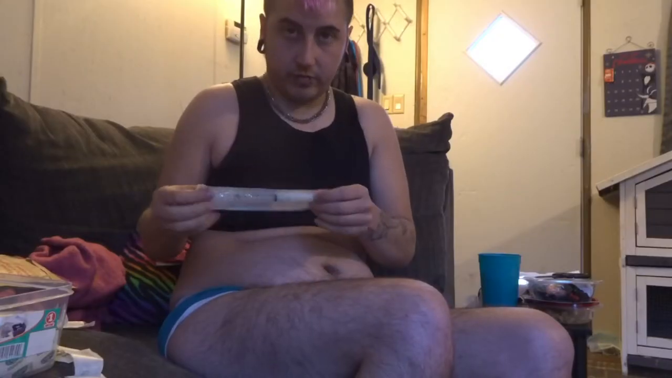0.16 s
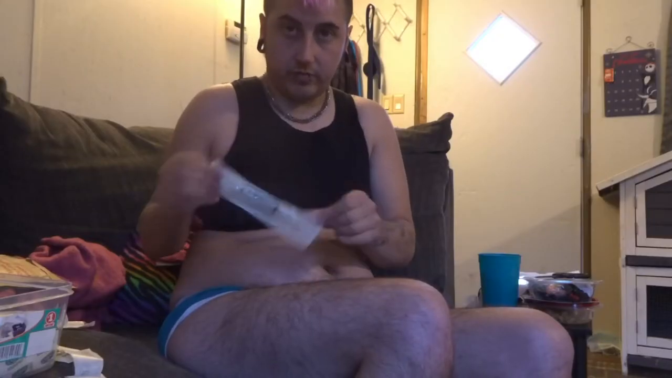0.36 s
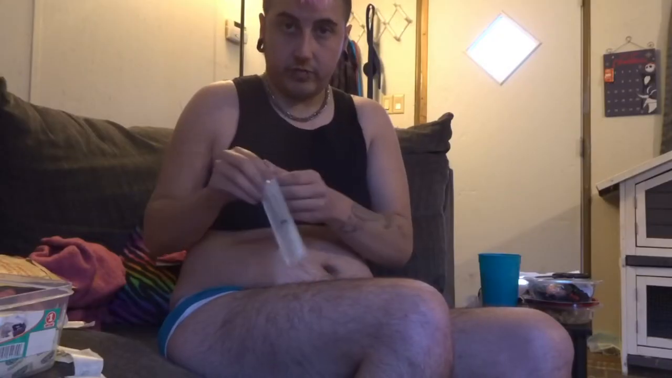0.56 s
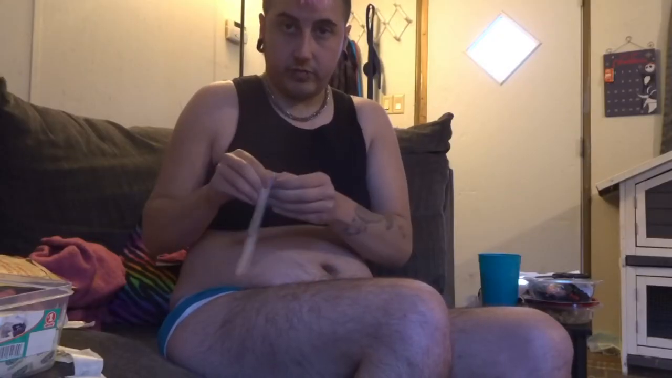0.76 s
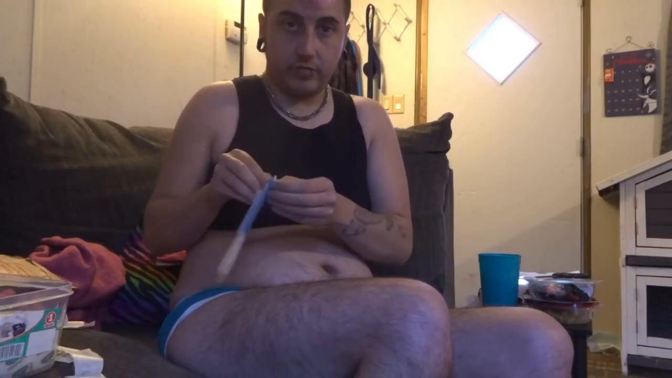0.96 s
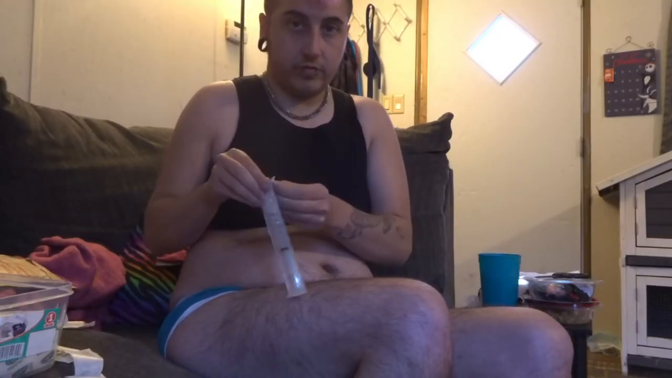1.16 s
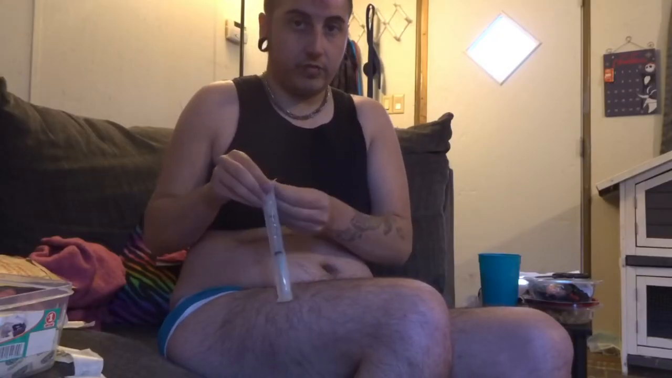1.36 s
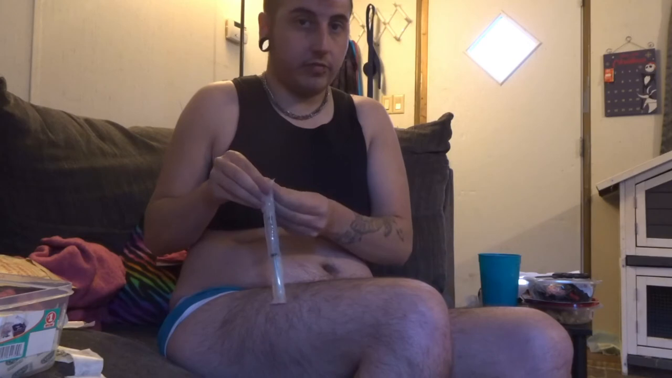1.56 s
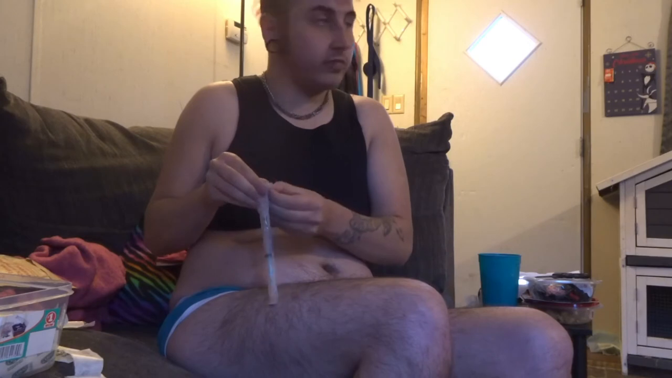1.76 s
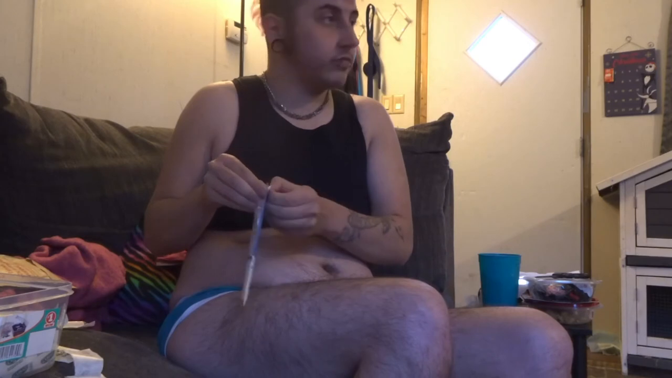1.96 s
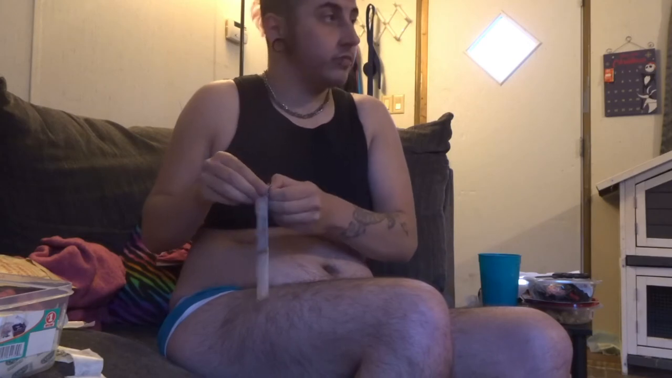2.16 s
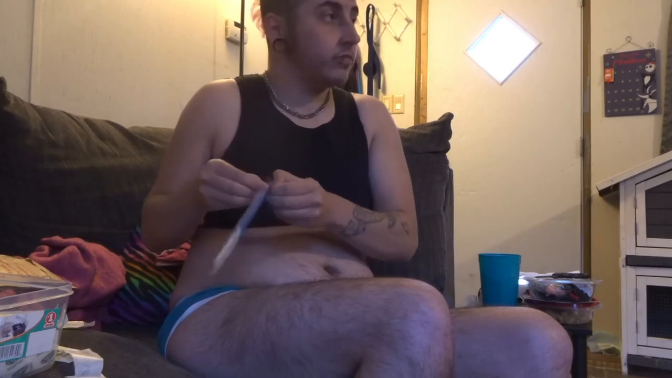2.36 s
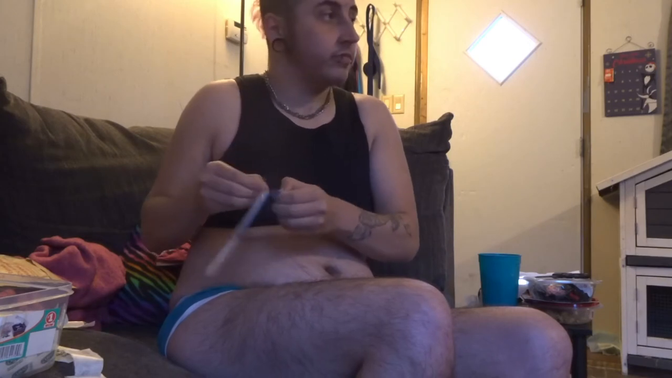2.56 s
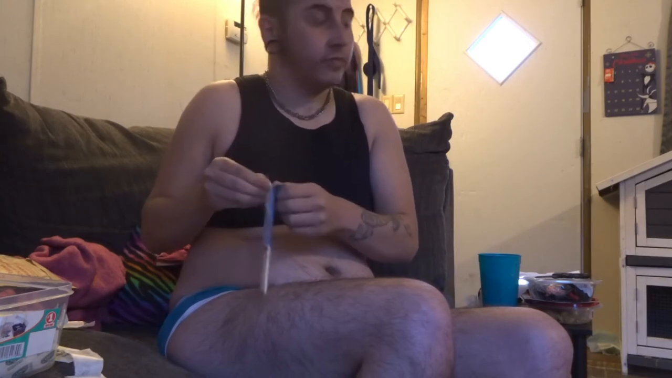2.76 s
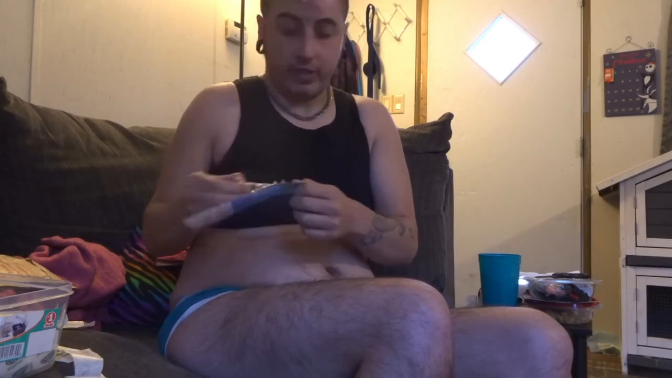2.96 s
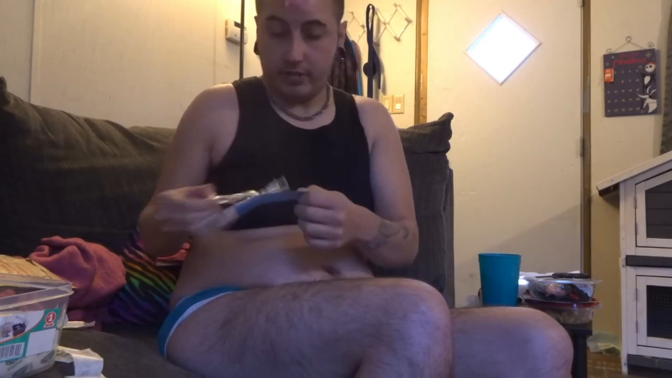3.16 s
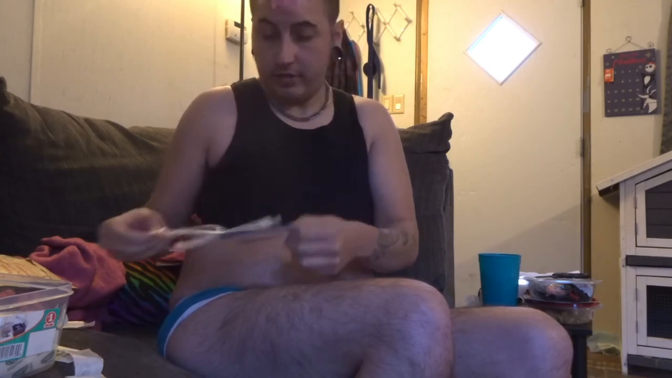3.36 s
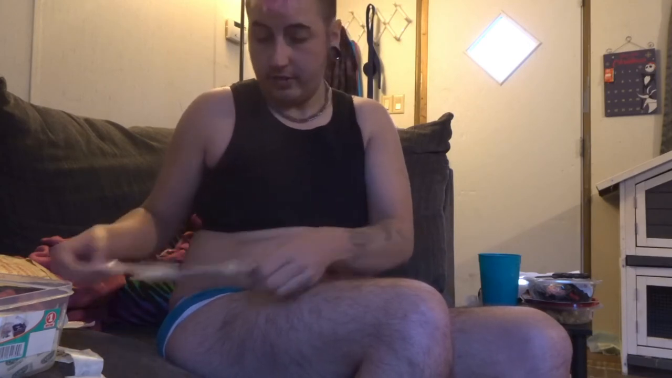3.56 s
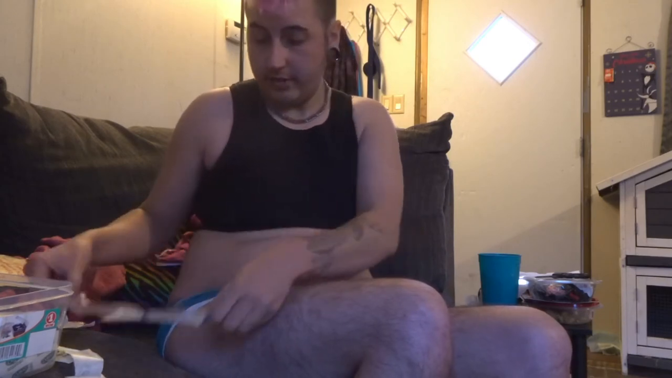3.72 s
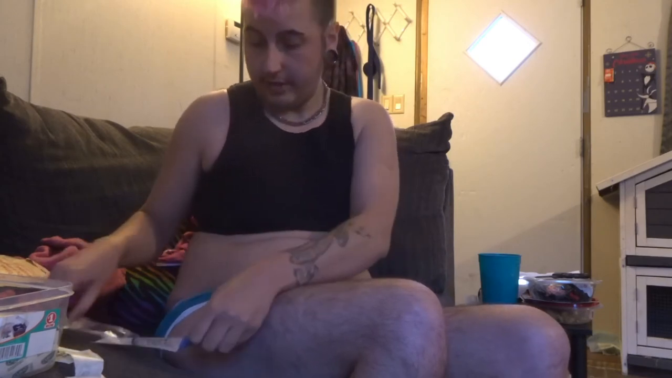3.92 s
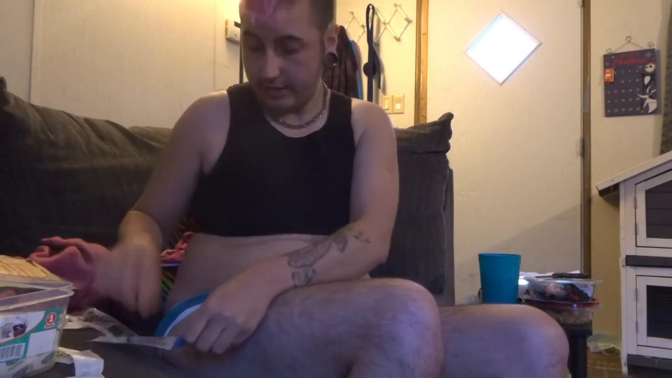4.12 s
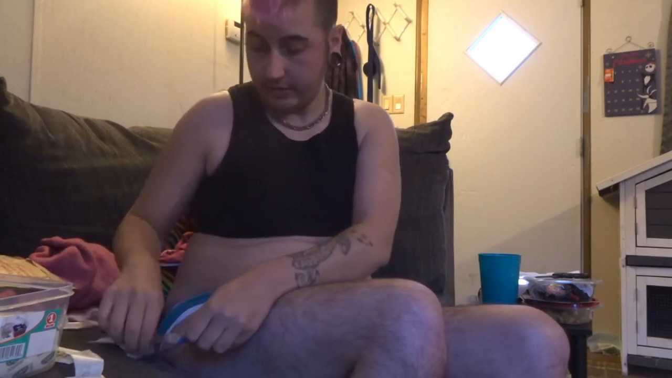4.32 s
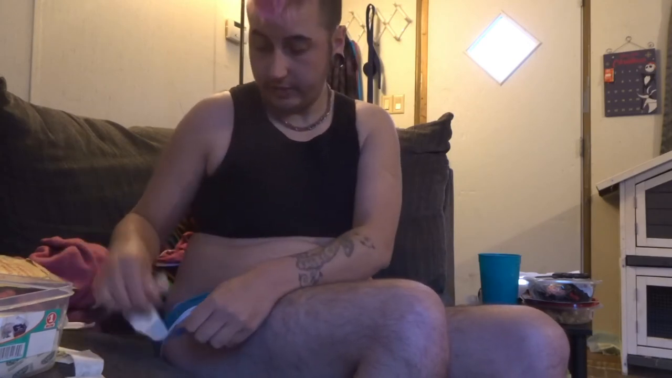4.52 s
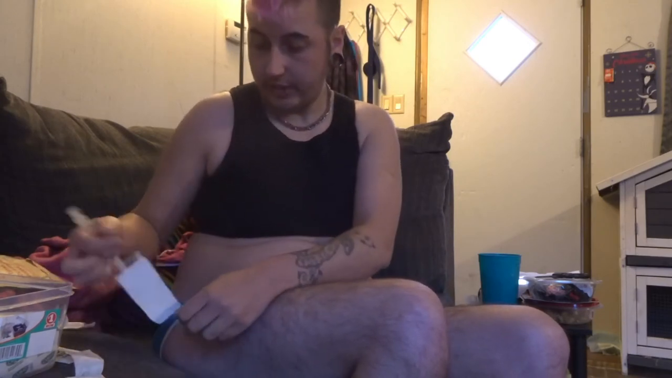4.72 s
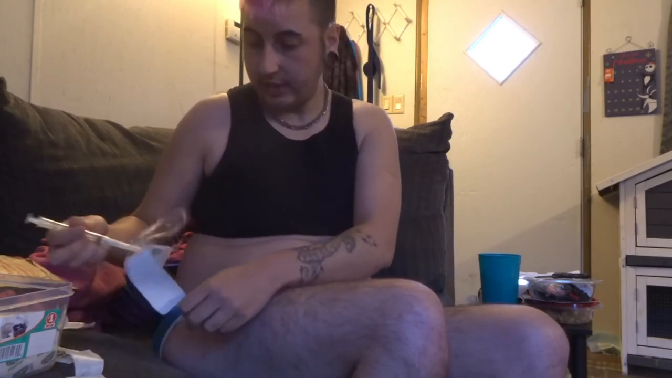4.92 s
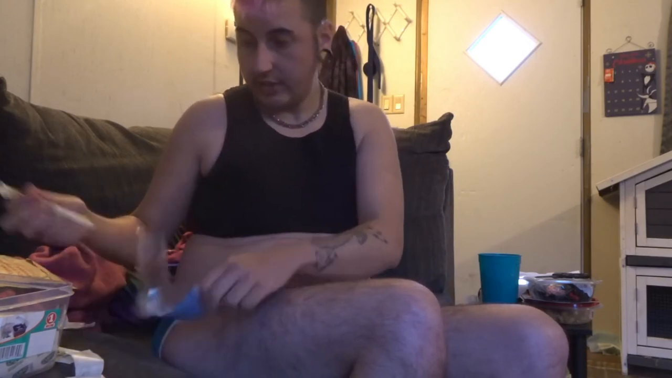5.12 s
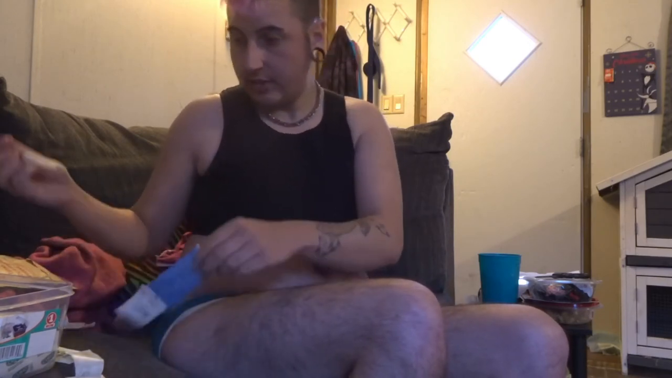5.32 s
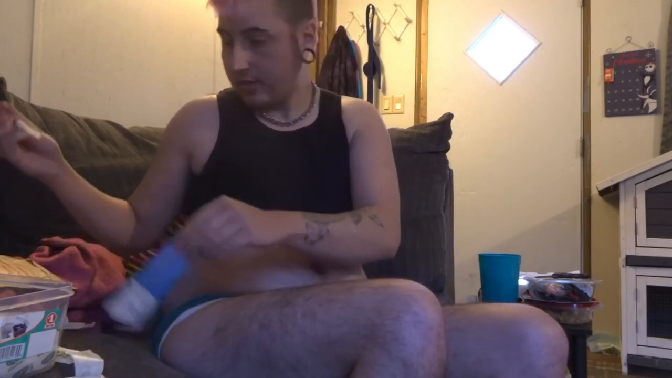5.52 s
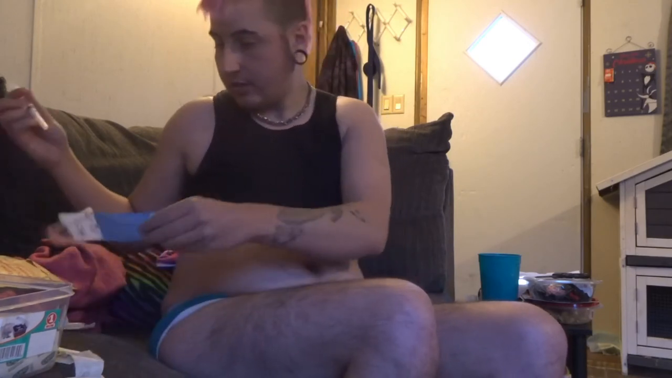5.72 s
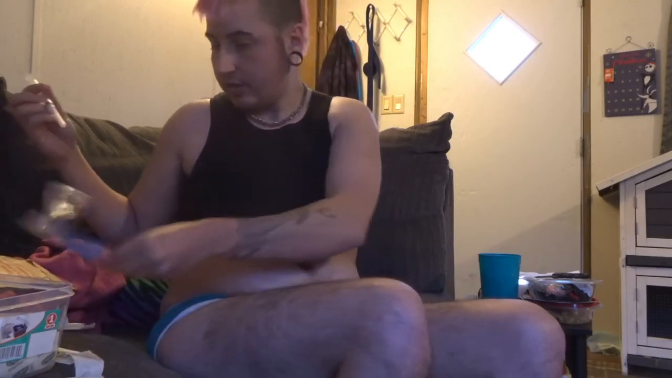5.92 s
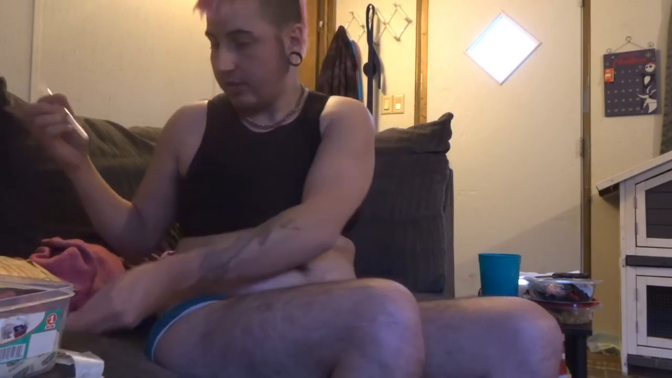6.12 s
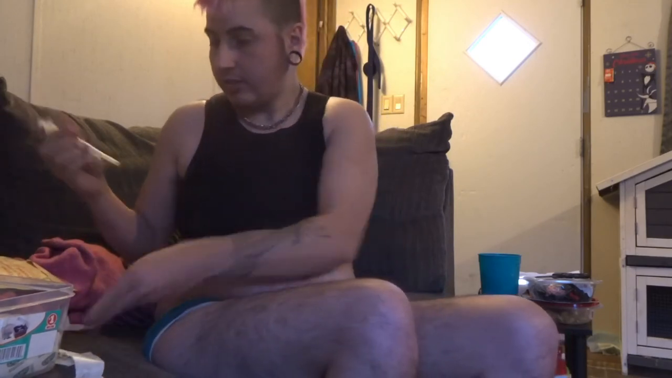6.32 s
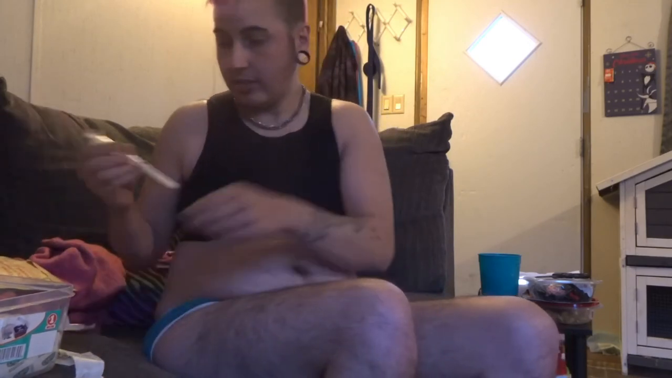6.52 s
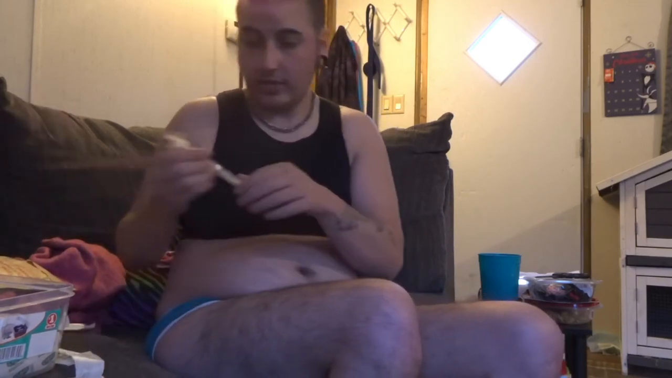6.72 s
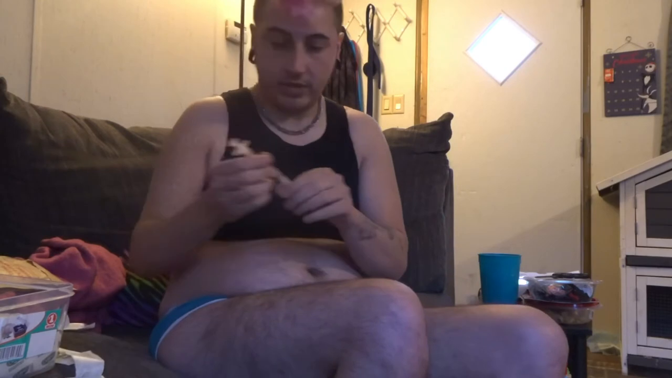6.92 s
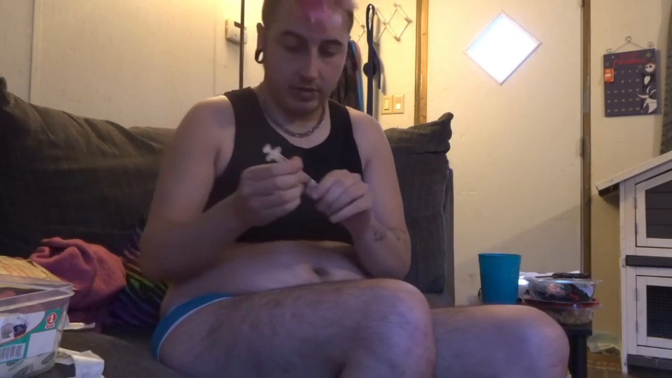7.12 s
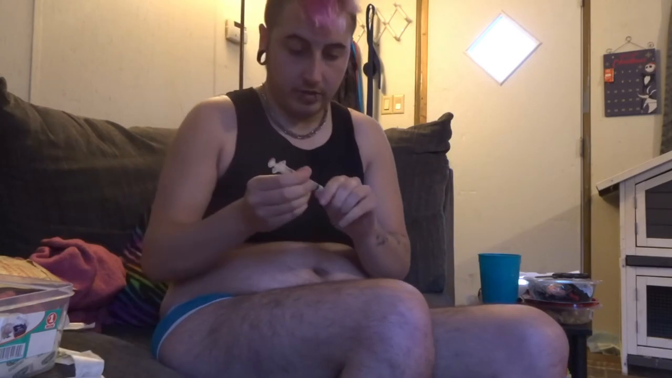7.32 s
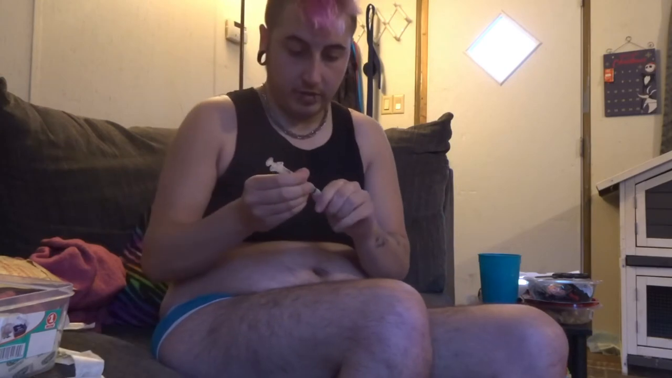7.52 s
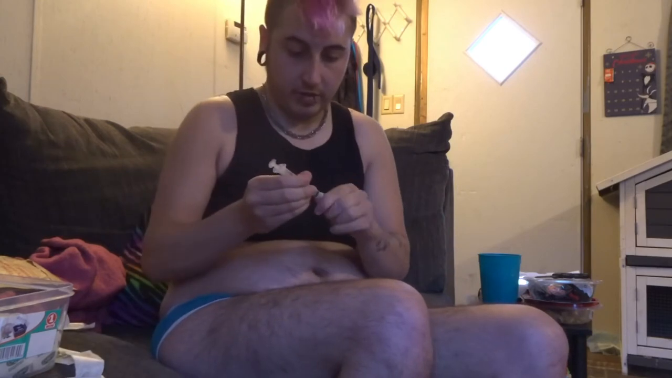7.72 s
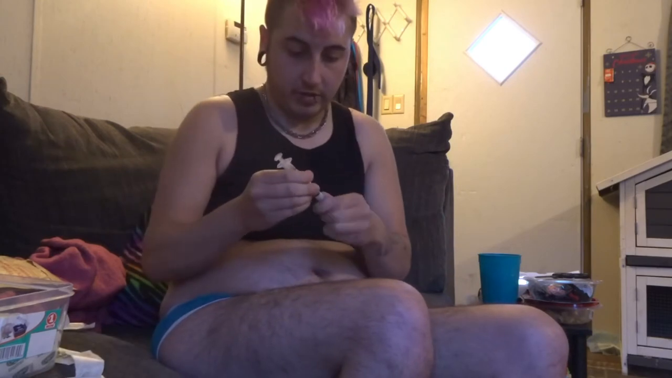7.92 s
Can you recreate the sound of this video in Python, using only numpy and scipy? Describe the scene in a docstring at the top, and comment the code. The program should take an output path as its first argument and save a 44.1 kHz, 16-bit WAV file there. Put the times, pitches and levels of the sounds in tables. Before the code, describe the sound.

Crisp plastic film buckles in uneven pops and crackles at the start, eases off, then builds into a ripping, crunchy peel around the three-second mark. Lighter, duller handling follows, with a short squeak and little low knocks, then very soft brushing and a few last ticks. A close stereo microphone on a table hears it in a small furnished room, with gentle hiss and a barely audible fan tone.

```python
"""Someone on a sofa picks at a stiff plastic wrapper, peels it open, slides a syringe out and lays the wrapper aside.
Facets of the film buckle with short pitched snaps, modal rings after a crack, over a crinkle of countless tiny pops.
Rips, squeaks, soft brushes, low knocks and short rings are bursts of filtered noise, each in one band.
Throughout, a close pair of microphone ports hears it across a table, in a small quiet room of scattered echoes,
with steady filtered hiss and a faint narrow fan whine."""
import sys
import numpy as np
from scipy import signal
from scipy.fft import rfft, irfft, next_fast_len
from scipy.io import wavfile

SR = 44100
rng = np.random.default_rng(int(sys.argv[2]) if len(sys.argv) > 2 else 0)


def inscribe(sig):
    """Save sig as 16-bit PCM at rate SR to the path in sys.argv[1].

    A 1-D sig is mono; a 2-D sig holds one channel per row.
    Samples are clipped to [-1, 1] before scaling.
    """
    pcm = np.round(np.clip(np.atleast_2d(sig).T, -1, 1) * 32767)
    wavfile.write(sys.argv[1], SR, pcm.astype(np.int16))


N = 351918  # samples

PORT_GAP_S = 6.5e-5  # sound's travel time between the ports, for diffuse sound
LEFT_LEAD_S = 3.2e-5  # the wrapper's sound reaches the left port first

SNAP_PAN_DB, SNAP_SCATTER_DB = 0.2, 2  # left minus right: mean and spread

# Buckling facets that stand out. Each row: start in seconds, energy over 1 ms in dB, pitch in Hz,
# treble crack against body in dB, ring time in ms (limited when the facet sounds).
SNAPS = [(0.014, -37, 4600, 6, 0.87), (.032, -35.5, 3660, 2.5, 0.55), (0.0453, -19, 4640, -8.5, 0.83),
         (0.087, -51, 4930, 3, .9), (0.124, -20.5, 2503, -10, 0.88), (0.1548, -9.5, 3550, -12.5, 1.5),
         (0.2551, -11, 3900, -10, 0.2), (.2771, -14, 2840, 0, 2), (0.3461, -18, 2490, -24, .7),
         (0.357, -17.5, 3180, -0.5, 2), (0.3845, -16, 2565, -31, 0.22), (0.4668, -25.5, 2970, -13, 0.49),
         (.491, -21, 3740, 2.5, 0.74), (0.5005, -25.5, 4520, -17, 0.88), (0.5675, -31, 2730, -17, 2.4),
         (0.5843, -34, 3500, -23, 2.9), (.6574, -30.5, 2110, -22, 1.3), (0.6717, -28.5, 2820, -31, 2.9),
         (.7867, -37, 3840, -16, 0.61), (0.8456, -32, 3730, -17, .5), (0.8564, -20, 3300, -11, 0.95),
         (1.1885, -26, 3240, -8, 1.1), (1.4511, -42, 3413, -3, 2), (1.6615, -35.5, 2600, -29, 1.27),
         (1.6947, -37.5, 1920, -10.5, 3.3), (1.7154, -36.5, 1930, -6, 0.86), (1.899, -44, 2220, -30, 1),
         (1.923, -41.5, 3080, -19, 0.93), (2.064, -40.5, 1900, -22.5, 0.49), (2.0966, -33, 4660, -6.5, 1.5),
         (2.152, -44, 3570, -19, 0.89), (2.1727, -30.5, 2720, -33, 2), (2.2056, -39.5, 2650, -21, 1),
         (2.219, -37, 3430, -35, 2), (2.2344, -36, 2336, -24.5, 1.2), (2.365, -39, 3230, -5, 1.9),
         (2.3724, -26, 2360, -15, 2), (2.391, -22.5, 2760, -16.5, 1.2), (2.434, -20.5, 3970, -7, 0.23),
         (2.4758, -22.5, 3370, -9, 2.2), (2.5625, -35, 3350, -14, 1.1), (2.6985, -24.5, 3120, -12.5, 2.2),
         (2.724, -37.5, 3320, -16, 1.26), (2.758, -30.5, 4655, -6, 0.67), (2.7704, -36.5, 4630, -7, 1.3),
         (2.8171, -38, 3190, -12, 2.5), (2.825, -28.5, 2800, -15, 0.41), (2.8377, -29, 3060, -6, 1.7),
         (2.848, -23, 4280, -8, 3.8), (2.8587, -23.5, 3450, -1, 2), (2.883, -20, 3030, -8.5, 2.8),
         (2.89, -24, 4140, -12, 1.2), (2.92, -16, 3270, -15.5, 1.6), (2.9302, -17.5, 4140, 11, 1.3),
         (2.9436, -26, 3150, -7, 1.4), (2.973, -26.5, 2620, -5, 3.1), (2.9806, -20, 3260, -20, 2.1),
         (2.9985, -25.5, 4800, -5, 2.5), (3.0427, -27, 3830, -13, 0.64), (3.1068, -14.5, 2330, -2.5, 3.7),
         (3.1802, -20.5, 3710, -3.5, 1.2), (3.1921, -20.5, 2710, -10, 2.9), (3.2, -24.5, 3845, -4, 0.93),
         (3.2231, -15.5, 3300, -2, 1.3), (3.2402, -23, 5600, -10, .7), (3.26, -25, 5330, -12, 1.2),
         (3.265, -20, 3800, -12, 1.1), (3.3222, -24, 2100, 2, 1.6), (3.388, -22.5, 2690, -11.5, 2.9),
         (3.469, -29, 3834, -1.5, 1.7), (3.4895, -24.5, 3300, -6, 1.18), (3.6101, -31, 3735, -16, 1.9),
         (3.6622, -39.5, 4300, -2.5, 0.86), (3.6693, -39.5, 4700, -6, 2.2),
         (3.7107, -41.5, 2600, -21.5, 1.5), (3.7301, -33.5, 3070, -4, 1.1), (3.753, -32, 3920, -6, 1.2),
         (3.7858, -23, 3020, -10, 3.1), (3.7947, -23, 5090, -3.5, 2.7), (3.8606, -35, 2100, -10, 2.7),
         (3.868, -37, 4190, 1, 2), (3.9007, -39.5, 2700, -14, 1.15), (3.908, -35, 2900, 3, 2.8),
         (3.973, -34, 2726, -13, 1.4), (4.2088, -31.5, 2780, -29, 0.94), (4.2163, -35.5, 4380, -14.5, 2.8),
         (4.2532, -33, 2620, -30, 2.7), (4.417, -38, 2570, -17, 2), (4.4244, -42.5, 2234, -22, 2.05),
         (4.4718, -30, 2556, -21, 3.1), (4.5143, -32, 3600, -16, 1.2), (4.524, -29, 2050, -15.5, 2.2),
         (4.6017, -27, 2400, -32, 3.4), (4.772, -44, 2380, -7.5, 0.51), (4.795, -36, 2220, 2, 2.9),
         (4.8921, -30.5, 3410, -14, 2.5), (4.938, -32, 2770, -34, 2.3), (4.9587, -24, 3530, -7.5, 1.7),
         (5.011, -48, 2270, -21, 2.2), (5.039, -36, 3500, -26, 3.2), (5.046, -44, 3220, -14, 1.5),
         (5.0659, -28, 2290, -40, 3.4), (5.189, -25.5, 3460, -17, 1.1), (5.2663, -22.5, 2650, -7, 0.73),
         (5.4312, -26.5, 2070, -20, 1.7), (5.527, -38.5, 2320, -23, 2.4), (6.1223, -33, 3100, -41, 2.6),
         (7.511, -47.5, 3100, 0, 1.9), (7.5872, -39, 2380, -1.5, 0.79), (7.6221, -36.5, 2640, -2, 1.5),
         (7.7061, -31, 2580, 1, 0.67)]


def snaps(rows, gain_db=0):
    """Snap-through buckling: facets flip one by one, each at its own spot on the wrapper."""
    out = np.zeros((2, N + SR))
    for s, db, hz, treble_db, ring_ms in rows:
        sound = facet(hz, treble_db, ring_ms)
        pan_db = SNAP_PAN_DB + SNAP_SCATTER_DB * rng.standard_normal()
        gain = undb(db + gain_db + np.array([[pan_db], [-pan_db]]) / 2)
        start = int(s * SR)
        out[:, start:start + sound.shape[1]] += sound * gain
    return out[:, :N]


# small, high facets ring mostly in the upper mode; both modes are equally strong at EVEN_HZ
EVEN_HZ, UPPER_DB_PER_OCTAVE = 2730, 23.5
UPPER_LEAST_DB, UPPER_MOST_DB = -4.5, 11  # every facet still sounds both modes
MODE_RATIO = 1.62  # upper against lower mode of a large facet
# a small facet rings at least at UPPER_MODE_HZ; the film around it adds the lower mode
UPPER_MODE_HZ, LOWER_MODE_HZ = 3180, 2562


def facet(hz, treble_db, ring_ms):
    """Modal scaling: a large facet is pitched by its lower mode, a small one by its upper mode."""
    upper_db = UPPER_DB_PER_OCTAVE * np.log2(hz / EVEN_HZ)
    upper_db = np.clip(upper_db, UPPER_LEAST_DB, UPPER_MOST_DB)
    if hz < LOWER_MODE_HZ:
        modes = (hz, hz * MODE_RATIO)
    else:
        modes = (LOWER_MODE_HZ, max(hz, UPPER_MODE_HZ))
    return snap(*modes, upper_db, treble_db, np.clip(ring_ms, .3, 2.5))


# Spectrum that the film gives a crack. Each row: frequency in Hz, spectral density in dB per Hz.
FILM = [(40, -59), (150, -31.5), (300, -41), (500, -21.5), (1000, -16), (1350, -7), (1800, -4.5),
        (3300, 3.5), (5000, 2.5), (8000, -3.5), (10500, -12), (12000, -31)]


def snap(lower_hz, upper_hz, upper_db, treble_db, ring_ms, tone_db=-1, hump_db=7, hump_octaves=0.2,
         crack_share=1.0, first_slip=4, disperse_s=.0005, size=2048):
    """Impulsive excitation of modes: a crack shaped by the film, and a few cycles of two modes."""
    f = bins(size)
    ms = np.arange(size) * 1000 / SR
    slips = rng.standard_normal((2, size)) * np.exp(-ms / (crack_share * ring_ms))
    slips[0, 0] = first_slip
    crack = ports(slips, 4e-5, LEFT_LEAD_S) * causal(shape_db(FILM, f))
    over_lower, over_upper = above(f, 2755), above(f, 6870)
    radiated = crossover(above(f, 1557))  # a small facet pushes no bass into the air
    lower_mode = (lower_hz, 0, 1 - over_lower)
    upper_mode = (upper_hz, upper_db, over_lower * (1 - over_upper))
    body = 0
    for hz, db, share in (lower_mode, upper_mode):
        hump = hump_db * np.exp(-.5 * (np.log2(f / hz) / hump_octaves) ** 2)
        rough = unit(irfft(crack * causal(hump) * crossover(share)))
        ring = np.sin(2 * np.pi * hz * ms / 1000) * np.exp(-ms / ring_ms)
        ring = unit(irfft(rfft(ring) * radiated))
        body = body + undb(db) * unit(rough + undb(tone_db) * ring)
    # bending waves disperse in the film, so the treble arrives as a very short smear
    smear = np.exp(1j * np.pi * disperse_s * (f - 12000) ** 2 / 6000)
    treble = unit(irfft(crack * crossover(over_upper) * smear))
    sound = (unit(body) + undb(treble_db) * treble)[:, :size // 2]
    return unit(sound) * np.sqrt(SR / 1000)  # the energy of an rms of 1 over 1 ms


# lesser facets flip at random while the film is worked; energy against the crinkle's level
TICKS_PER_S, TICK_DB, TICK_SPREAD_DB, TICK_TREBLE_DB, TICK_RING_MS = 45, 6.5, 3, -10, 1.3


def ticks(level_db, firm_db=-57, low_hz=2200, high_hz=4600, count=400):
    """Random point process: rows for lesser snaps, which come by chance and only under a firm touch."""
    rows = []
    chosen = TICKS_PER_S * N / SR / count
    for when, chance, strength, pitch in rng.random((count, 4)):
        work_db = level_db[int(when * N)]
        if chance < chosen and work_db > firm_db:
            db = work_db + TICK_DB + TICK_SPREAD_DB * (2 * strength - 1)
            hz = low_hz * (high_hz / low_hz) ** pitch
            rows.append((when * N / SR, db, hz, TICK_TREBLE_DB, TICK_RING_MS))
    return rows


# Colour of the crinkle before its bands are levelled. Each row: frequency in Hz, level in dB.
RUSTLE = [(40, -59), (200, -38), (300, -24), (450, -15.5), (700, -16), (1400, -8.5), (2200, 8),
          (3100, 15.5), (4200, 7.5), (6500, 3), (9000, -1), (11200, -7)]


def crinkle(level_db, treble_db, bass_db, gain_db=0, rub_db=-9, firm_db=-52, pan_db=2.0, fits_db=4.5):
    """Crackling noise: popping creases over film rubbing on fingers, both following the working."""
    size = len(level_db)
    f = bins(size)
    noise = rng.standard_normal((2, size))
    rub = irfft(ports(noise, 5e-5, LEFT_LEAD_S) * np.sqrt(above(f, 200)))
    # a light touch only rubs; a firm one makes creases pop
    popping = 1 / (1 + undb(2 * (firm_db - level_db)))
    film = popping * unit(creases(size)) + undb(rub_db) * unit(rub)
    film = film / np.hypot(popping, undb(rub_db))
    film = rfft(film) * undb(shape_db(RUSTLE, f))
    high, low = above(f, 5700), 1 - above(f, 1508)
    shares = (low, (1 - low) * (1 - high), high)
    bass, body, treble = (steady(irfft(film * np.sqrt(share))) for share in shares)
    # the film catches and lets go in fits
    level_db = level_db + fits_db * popping * (np.minimum(waver(90, size), 1.5) - .2)
    # taut film sounds bright, slack film dull
    sound = body + undb(treble_db) * treble + undb(bass_db) * bass
    sound = sound / np.sqrt(1 + undb(treble_db) ** 2)
    gain = undb(level_db + gain_db + np.array([[pan_db], [-pan_db]]) / 2)
    return (sound * gain)[:, :N]


def creases(size, ring_ms=0.26, ring_octaves=0.99, scatter_hz=7000, count=160):
    """Granular superposition: tiny creases pop at random, each with its own pitch, ring and direction."""
    pops = int(2200 * size / SR)  # 2200 a second
    when, pitch, ring, strength, turn, facing = rng.random((pops, 6)).T[:, :, None]
    ms = np.arange(count) * 1000 / SR
    hz = 900 + 9800 * pitch ** 1.3
    fall_ms = ring_ms * 2 ** (ring_octaves * (4 * ring - 2))
    gain = undb(4 * np.minimum(-np.log(strength), 3)) / np.sqrt(fall_ms)
    at = (when * (size - count)).astype(int) + np.arange(count)
    fading = gain * np.exp(-ms / fall_ms)
    flip = np.pi * (turn > .5)
    out = []
    for side in (1, -1):
        # the higher the pitch, the more the two ports differ in phase
        direction = port_phase(hz, LEFT_LEAD_S) / 2 + (2 * facing - 1) * hz / scatter_hz
        grains = fading * np.sin(2 * np.pi * hz * ms / 1000 + side * direction + flip)
        out.append(np.bincount(at.ravel(), grains.ravel(), size))
    # such small creases radiate no deep bass
    return irfft(rfft(np.array(out)) * np.sqrt(above(bins(size), 230)))


# each snap unsettles the creases around it: level against the snap, treble and bass against body
SETTLE_DB, SETTLE_TREBLE_DB, SETTLE_BASS_DB = -25, -2, -13.5
BUILD_S, SETTLE_S = 0.0036, 0.017  # the creases begin to give just before a facet flips, then decay
GRIP_ATTACK_S, GRIP_RELEASE_S = 0.025, 0.0098
# a light touch is more a soft rub, a firm one more crackle: bass against body at LIGHT_GRIP_DB, and its slope
GRIP_BASS_DB, LIGHT_GRIP_DB, BASS_DB_PER_DB = -13, -47.5, -0.71
IDLE_DB, IDLE_TREBLE_DB, IDLE_BASS_DB = -69.5, -0.5, 1.5  # the hands never lie quite still

# The fingers work the film. Each row: start in seconds, length before release in seconds,
# level in dB, treble against body in dB.
GRIPS = [(.01, 0.074, -51.5, 2), (0.104, 0.028, -41, 6), (0.151, 0.027, -34, 13), (0.24, 0.016, -34.5, 0.5),
         (0.36, 0.068, -57, -2), (0.461, 0.081, -48, 22.5), (0.536, 0.11, -57.5, 1), (0.79, 0.041, -56, -1),
         (0.836, 0.053, -45.5, -0.5), (0.929, 0.12, -59.5, 1.5), (1.366, 0.045, -60.5, 0),
         (1.451, 0.071, -56, 4), (1.54, 0.037, -62, 0.5), (1.659, 0.087, -55.5, -4),
         (1.751, 0.065, -58, -5.5), (1.902, 0.091, -57, -3), (2.001, 0.1, -61, -2),
         (2.095, 0.043, -52.5, -5), (2.212, 0.042, -57, -8), (2.343, 0.065, -45.5, -6),
         (2.392, 0.067, -43, -7), (2.499, 0.048, -46, 1), (2.666, 0.019, -55, 3), (3.613, .12, -56, -2),
         (3.732, 0.1, -49.5, -3.5), (3.84, 0.083, -52.5, -1), (3.966, 0.032, -57, -2),
         (4.09, 0.032, -58, -12.5), (4.131, 0.15, -49.5, -3.5), (4.39, 0.16, -57, -11),
         (4.54, 0.087, -61.5, -8), (4.668, 0.061, -50, 2.5), (4.764, 0.067, -50.5, 2),
         (4.866, 0.047, -48, -3.5), (4.927, 0.085, -44.5, -28.5), (5.047, .11, -57, -16),
         (5.155, 0.082, -52.5, 2), (5.248, 0.025, -49, -6), (5.351, 0.045, -61, -3),
         (5.526, 0.081, -60.5, -7), (5.612, 0.056, -61.5, -5), (6.047, 0.16, -57.5, 1),
         (6.105, 0.05, -51.5, -10), (6.171, 0.044, -58, -7), (6.215, 0.066, -63.5, 7),
         (7.457, 0.055, -72.5, -3), (7.6, 0.065, -62, 14), (7.703, 0.028, -57.5, 12)]
# The long pull that opens the seal, joined by straight lines. Each row: time in seconds, level in dB,
# treble against body in dB, bass against body in dB.
PEEL = [(2.732, -58.5, 12, 5), (2.819, -37.5, -8.5, -16.5), (2.915, -34, 8.5, -12), (2.95, -36, 9.5, -8.5),
        (3.085, -47, 5, 3), (3.108, -20.5, 0.5, -27), (3.164, -46.5, -2, -3), (3.235, -31.5, 5, -15),
        (3.33, -43.5, 7, -1.5), (3.375, -48, 2, -1.5), (3.409, -45.5, -1, -4.5), (3.455, -50.5, -7, -2.5),
        (3.495, -40, 5.5, -6.5), (3.58, -70, -8, -5)]


def handling(size):
    """Power summation: grips, peel and settling after snaps add up to level, treble and bass in dB."""
    t = np.arange(size) / SR

    def powers(db, treble_db, bass_db):
        """Energy partition: the level is split over body and treble, with bass set against body."""
        body = undb(db) ** 2 / (1 + undb(treble_db) ** 2)
        bands = [body, body * undb(treble_db) ** 2, body * undb(bass_db) ** 2]
        return np.array(bands).reshape(3, -1)

    s, db, treble_db, bass_db = np.transpose(PEEL)
    pulling = (t > s[0]) * (t < s[-1])
    power = powers(np.interp(t, s, db), np.interp(t, s, treble_db), np.interp(t, s, bass_db)) * pulling
    power += powers(IDLE_DB, IDLE_TREBLE_DB, IDLE_BASS_DB)
    for s, length_s, db, treble_db in GRIPS:
        start = int(s * SR)
        age = t[:min(SR // 2, size - start)]
        release = np.exp(-np.maximum(age - length_s, 0) / GRIP_RELEASE_S)
        swell = np.minimum(age / GRIP_ATTACK_S, 1) * release
        bass_db = GRIP_BASS_DB + BASS_DB_PER_DB * (db - LIGHT_GRIP_DB)
        power[:, start:start + len(age)] += powers(db, treble_db, bass_db) * swell ** 2
    for s, db, *_ in SNAPS:
        near = slice(max(int(s * SR) - SR // 20, 0), int(s * SR) + SR // 4)
        age = t[near] - s
        stir = np.exp(np.minimum(age / BUILD_S, -age / SETTLE_S))
        power[:, near] += powers(db + SETTLE_DB, SETTLE_TREBLE_DB, SETTLE_BASS_DB) * stir ** 2
    body, treble, bass = power
    return 10 * np.log10([body + treble, treble / body, bass / body])


RISE_SHARE = 0.24  # rise time against fall time

# Rips, squeaks, soft brushes, low knocks and short rings. Each row: start in seconds,
# level before the swell in dB, fall time in seconds, centre in Hz, width in octaves.
BURSTS = [(.05, -54, 0.018, 1228, .13), (.253, -41, 0.0039, 850, 0.45), (.276, -52.5, 0.014, 350, 0.16),
          (.277, -43.5, 0.0047, 955, 0.16), (1.195, -52, 0.015, 1260, 0.18),
          (2.387, -50.5, 0.056, 1180, 0.16), (2.75, -49, 0.029, 1139, 0.26), (2.87, -55.5, 0.23, 875, .45),
          (3.1, -30, 0.028, 3703, 0.9), (3.2, -57, 0.1, 503, 0.14), (3.319, -29.5, 0.015, 2075, 0.049),
          (3.35, -50.5, 0.015, 488, 0.18), (4.142, -34, 0.017, 4730, 0.7), (4.956, -34, 0.022, 2053, 0.059),
          (5.135, -50.5, 0.0066, 752, 0.38), (5.185, -52, 0.0077, 580, 0.15),
          (5.733, -51, 0.011, 1035, 0.88), (5.744, -50, 0.04, 2100, 0.66), (5.953, -60, 0.053, 2700, 0.71),
          (6.121, -62, 0.018, 416, 0.91), (6.372, -59.5, 0.076, 3180, 0.61),
          (6.591, -59.5, 0.06, 3000, 0.39), (6.801, -62, 0.064, 2500, 0.46),
          (7.011, -63, 0.041, 3090, 0.33), (7.235, -60, 0.027, 3000, 0.21),
          (7.455, -62.5, 0.053, 3040, 0.19)]


def bursts(grain_db=4, size=16384):
    """Filtered noise bursts: each a quick swell and fall of dense noise in one band."""
    out, t, f = np.zeros((2, N + size)), np.arange(size) / SR, bins(size)
    for s, db, fall_s, hz, octaves in BURSTS:
        rise_s = RISE_SHARE * fall_s
        noise = rng.standard_normal((2, size)) * undb(grain_db * (2 * rng.random(size) - 1))
        band = np.exp(-(np.log2(f / hz) / octaves / 2) ** 2) * np.sqrt(above(f, 240) / f)
        swell = np.minimum(t / rise_s, 1) ** .5 * np.exp(-np.maximum(t - rise_s, 0) / fall_s)
        banded = steady(irfft(ports(noise, 4.5e-5, LEFT_LEAD_S) * band))
        start = int(s * SR)
        out[:, start:start + size] += undb(db) * swell * banded
    return out[:, :N]


# Colour of all the echoes. Each row: frequency in Hz, gain in dB.
ROOM_COLOUR = [(100, -30.5), (700, 9.5), (1200, -0.5), (2000, -1.5), (3000, -2), (6000, 1), (11000, 2)]
# Resonances that linger in the echoes. Each row: frequency in Hz, width in Hz, level in dB.
LINGER = [(1230, 7.9, 15), (2140, 56, 4), (3250, 190, -7), (3440, 170, 3.5)]


def room(x, t60_s=0.61, treble_t60_s=0.45, tail_db=-11, table_db=-13, wall_db=-18, smear_s=0.0085,
         size=32768):
    """Convolution reverberation: scattered echoes from the cluttered table and a wall, and a short tail."""
    t, f = np.arange(size) / SR, bins(size)

    def scatter(start_s, fall_s):
        """Diffuse reflection: noise that sets in and dies away exponentially."""
        fading = (t > start_s) * np.exp(-np.maximum(t - start_s, 0) / fall_s)
        noise = rng.standard_normal((2, size)) * fading
        return rfft(unit(irfft(ports(noise, PORT_GAP_S))))

    high = above(f, 5000)
    first_s = .005
    tail = np.sqrt(1 - high) * scatter(first_s, t60_s / np.log(1000))
    tail = tail + np.sqrt(high) * scatter(first_s, treble_t60_s / np.log(1000))
    table = undb(table_db) * scatter(0.0063, smear_s)
    wall = undb(wall_db) * scatter(0.026, smear_s / 2)
    echoes = undb(tail_db) * tail + table + wall
    resonances = 1 + sum((undb(db) - 1) / (1 + 2j * (f - hz) / width_hz) for hz, width_hz, db in LINGER)
    response = irfft(echoes * resonances * undb(shape_db(ROOM_COLOUR, f)))
    return signal.fftconvolve(x, response, axes=1)[:, :N]


AIR_DB = -69.5  # rms of the hiss
# Colour of the hiss. Each row: frequency in Hz, relative level in dB.
AIR = [(25, -62.5), (90, -18), (175, -25), (250, -2), (450, -9), (580, -7.5), (705, 10.5), (860, -14),
       (1100, 2), (1900, -17.5), (2600, -20.5), (4500, -13.5), (8400, -5.5), (11200, -14)]
# Fan whine. Each row: frequency in Hz, width in Hz, level in dB before it wavers.
FAN = [(716, 61, -85), (2940, 25, -80.5), (8240, 56, -90)]


def air(waver_db=1.5):
    """Filtered noise: steady room hiss with the narrow, slightly wavering whine of a small fan."""
    f = bins(N)
    hiss, whine = (ports(rng.standard_normal((2, N)), PORT_GAP_S) for _ in range(2))
    out = undb(AIR_DB) * steady(irfft(hiss * undb(shape_db(AIR, f))))
    for hz, width_hz, db in FAN:
        tone = steady(irfft(whine / (1 + (2 * (f - hz) / width_hz) ** 2)))
        out = out + undb(db + waver_db * waver(30, N)) * tone
    return out


def ports(pair, gap_s, lead_s=0):
    """Spatial coherence: two unrelated signals become spectra at two ports, drifting apart in the treble."""
    f = bins(pair.shape[-1])
    alike = np.interp(f, [1000, 2000], [.82, .98]) * np.sinc(2 * f * gap_s)
    mid, side = rfft(pair) * np.sqrt([1 + alike, 1 - alike])
    return np.array([mid + side, (mid - side) * np.exp(-1j * port_phase(f, lead_s))])


def port_phase(f, lead_s, corner_hz=2500):
    """Path difference: radians by which the left port leads; long waves reach both in step."""
    return 2 * np.pi * f * lead_s * f ** 2 / (f ** 2 + corner_hz ** 2)


def waver(per_s, size):
    """Random modulation: random levels joined by straight lines, with a spread near 1."""
    steps = rng.standard_normal(2048)
    return 1.2 * np.interp(np.arange(size) / SR * per_s, np.arange(len(steps)), steps)


def above(f, hz):
    """Power crossover: the share of the power that a steep filter sends upward."""
    return 1 / (1 + (hz / f) ** 12)


def crossover(share):
    """Minimum-phase crossover: a causal filter passing a given share of the power at each frequency."""
    return causal(10 * np.log10(share + 1e-5))


def causal(db):
    """Minimum phase by the folded cepstrum: a sharp start, ringing only afterwards."""
    cepstrum = irfft(np.log(undb(db)))
    half = len(cepstrum) // 2
    cepstrum[1:half] *= 2
    cepstrum[half + 1:] = 0
    return np.exp(rfft(cepstrum))


def shape_db(points, f):
    """Spectral envelope: points joined by straight lines on a log-frequency axis."""
    hz, db = np.transpose(points)
    return np.interp(np.log(f), np.log(hz), db)


def bins(size):
    """Fourier analysis: the frequencies of a real transform in Hz, at least 1."""
    return np.maximum(np.arange(size // 2 + 1) * SR / size, 1)


def undb(db):
    """Logarithmic level: decibels to amplitude gain."""
    return 10 ** (np.asarray(db) / 20)


def unit(x):
    """Energy normalisation: scale to a mean energy of 1 a channel."""
    return x / np.sqrt(np.mean(x ** 2) * x.shape[-1] + 1e-30)


def steady(x):
    """Power normalisation: scale to an rms of 1."""
    return x / np.sqrt(np.mean(x ** 2))


def scene():
    """Superposition: the wrapper, its echoes and the quiet room add linearly."""
    level_db, treble_db, bass_db = handling(next_fast_len(N // 2) * 2)
    quiet = air()
    wrapper = snaps(SNAPS) + crinkle(level_db, treble_db, bass_db) + bursts() + snaps(ticks(level_db))
    return wrapper + room(wrapper) + quiet


TOP_HZ = 11100


def record(dry):
    """Band limiting: the recorder cuts the top steeply with an elliptic low-pass."""
    return signal.sosfilt(signal.ellip(10, .2, 70, TOP_HZ, fs=SR, output="sos"), dry)


dry = scene()
out = record(dry)
inscribe(out)
```